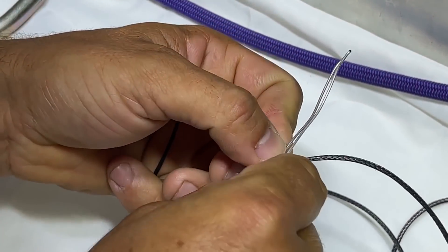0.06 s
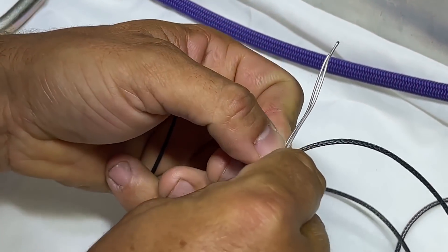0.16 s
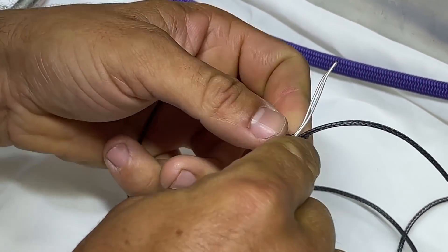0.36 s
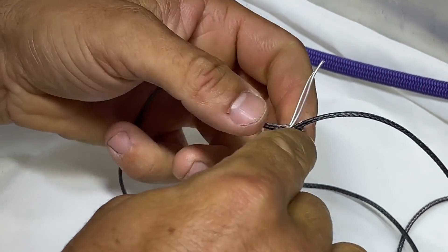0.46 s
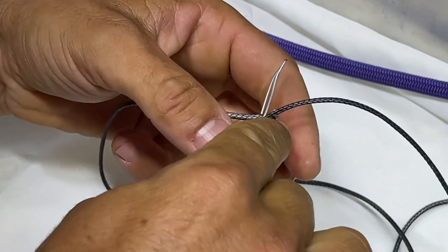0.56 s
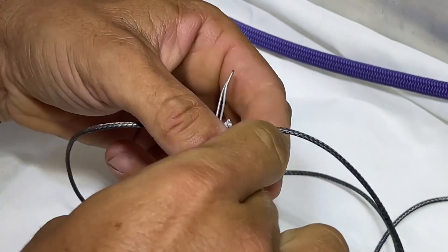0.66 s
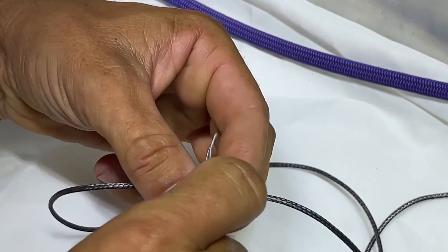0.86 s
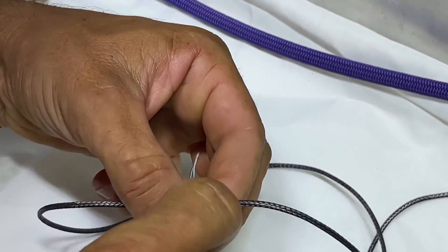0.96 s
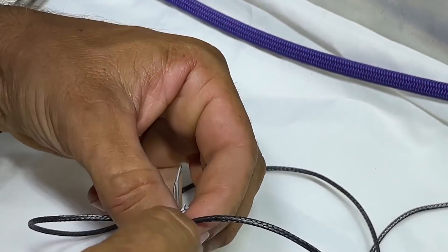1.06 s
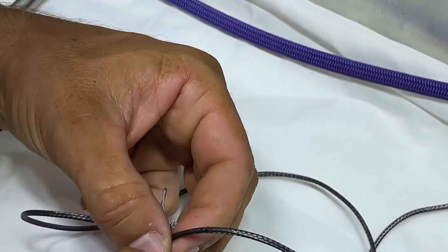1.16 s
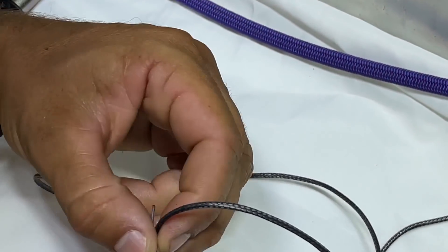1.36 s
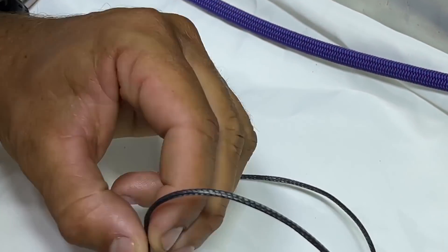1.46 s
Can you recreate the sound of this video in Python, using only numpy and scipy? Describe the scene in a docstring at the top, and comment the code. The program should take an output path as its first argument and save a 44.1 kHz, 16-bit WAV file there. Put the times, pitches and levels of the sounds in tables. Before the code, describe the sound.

A sharp double knock on a hard object comes at about 0.2 seconds, and the table rings low for a moment. A cord rustles softly, with light clicks and two faint, high wire squeaks around 0.7 seconds. Four short, ringing scrapes follow between 0.8 and 1.1 seconds. Lighter clicks and scrapes come from 1.2 to 1.5 seconds. Everything is close, over a faint electrical hum in a quiet room.

```python
"""Cord and wire tool at a work table

Close to the microphone, in a quiet room with a mains hum, hands work a cord with a thin wire tool.
The cord rustles through the fingers and makes the wire sing as it slides; the tool clicks lightly.
Something hard on the table is knocked, then scraped in a few short strokes, and rings with the
same modes each time. Under the heavy knock the table top rings low."""
import sys
import numpy as np
from scipy import signal
from scipy.fft import rfft, irfft, next_fast_len
from scipy.io import wavfile
from scipy.ndimage import map_coordinates

SR = 44100
rng = np.random.default_rng(int(sys.argv[2]) if len(sys.argv) > 2 else 0)


def bounce(signal):
    """Save signal as a 16-bit WAV file at the path given by the first command-line argument."""
    frames = np.transpose(np.atleast_2d(signal))
    limited = np.clip(frames, -1, 1)
    pcm = np.round(limited * 32767).astype(np.int16)
    wavfile.write(sys.argv[1], SR, pcm)


N = 66150


def amp(db):
    return 10 ** (np.asarray(db) / 20)


def unit_rms(x):
    return x / np.sqrt(np.mean(x ** 2) + 1e-20)


def along(points, hz):
    """Read (pitch_hz, value) points on a log frequency axis."""
    pitches, values = np.transpose(points)
    return np.interp(np.log(hz + 1), np.log(pitches + 1), values)


def since(start_s):
    """Seconds since start_s, zero before it."""
    return np.maximum(np.arange(N) / SR - start_s, 0)


def fade(t, t60):
    return np.exp(-np.log(1000) * t / t60)


def wobble(knots_per_s):
    """A smooth random curve."""
    return map_coordinates(rng.standard_normal(N), [since(0) * knots_per_s], mode="wrap")


def filtered(x, response):
    """Apply the gain response(hz) to x."""
    size = next_fast_len(N + SR // 2)
    return irfft(rfft(x, size) * response(np.fft.rfftfreq(size, 1 / SR)), size)[..., :N]


def tone(hz, left_db=0, drift_rad=0.23, drift_per_s=40, spread_rad=0.49):
    """One slightly unsteady mode, its phase spread between left and right."""
    phase = 2 * np.pi * (hz * since(0) + rng.random()) + drift_rad * wobble(drift_per_s)
    sides = np.array([[.5], [-.5]])
    return np.sqrt(2) * amp(sides * left_db) * np.sin(phase + sides * spread_rad * rng.choice([-1, 1]))


# Likeness of left and right at the microphone: pitch_hz, correlation
STEREO_LIKENESS = [(100, 0.97), (300, 0.45), (700, 0.8), (2000, 0.91), (4000, 0.78), (6500, 1), (8000, 1),
                   (10000, -0.95), (12000, 0.028)]
# Balance at the microphone: pitch_hz, left_over_right_db
STEREO_BALANCE = [(200, 2.2), (600, 1.6), (1200, 3), (2000, -0.5), (8000, 0.5)]
def coloured(pair, spectrum):
    """Two unrelated signals become a stereo sound of rms 1; the spectrum sets only its shape."""
    def mid_side_gain(hz):
        angle = np.arccos(np.clip(along(STEREO_LIKENESS, hz), -1, 1)) / 2
        return amp(along(spectrum, hz)) * [np.cos(angle), np.sin(angle)]
    mid, side = filtered(pair, mid_side_gain)
    balance = lambda hz: amp(np.outer([.5, -.5], along(STEREO_BALANCE, hz)))
    return unit_rms(filtered(np.array([mid + side, mid - side]), balance))


def noise(spectrum):
    return coloured(rng.standard_normal((2, N)), spectrum)


# Room tone around the table: pitch_hz, density_db
ROOM_SPECTRUM = [(20, -24), (45, -4.5), (70, 4.5), (95, -1), (160, -11.5), (300, -16.5), (440, -17),
                 (650, -35), (1200, -35), (4000, -58.5), (11000, -37.5), (13000, -62)]
def room(rumble_db=-61.5, hum_hz=119.8, hum_db=-52.5):
    """Mains hum over the low rumble of a quiet room."""
    hum = np.sqrt(2) * np.sin(2 * np.pi * hum_hz * since(0))
    return amp(rumble_db) * noise(ROOM_SPECTRUM) + amp(hum_db) * hum


# The cord's high hiss and lower rub, close to the microphone: time_s, level_db
HISS_LEVELS = [(0, -81), (.1, -84.5), (.16, -89), (.19, -70), (.33, -64), (.40, -60.5), (.46, -72),
               (.53, -63.5), (.59, -61.5), (.66, -55.5), (.70, -64), (.76, -60.5), (.83, -68.5),
               (1.1, -80.5), (1.17, -68.5), (1.23, -71.5), (1.36, -66.5), (1.42, -72), (1.5, -56.5)]
RUB_LEVELS = [(0, -92.5), (.17, -90), (.39, -74.5), (.46, -69), (.55, -73.5), (.62, -66), (.7, -61.5),
              (.78, -59), (.84, -56.5), (1.1, -78), (1.21, -80.5), (1.41, -75), (1.5, -58)]
# Their colours: pitch_hz, density_db
HISS_SPECTRUM = [(2000, -11.5), (3500, 4), (4600, -4.5), (5400, 1), (7000, -2), (8700, 7), (10200, 11.5),
                 (11700, -9.5), (12600, -35), (14000, -48)]
RUB_SPECTRUM = [(400, -30), (880, -5), (1170, 10), (1600, 9.5), (2200, 11), (3000, -5.5), (4500, 0.5),
                (8000, -39)]
def cord_rustle(levels, spectrum, fibre_db=0.5, grip_db=2.5):
    """Fibres catch in fine grains while the grip of the fingers wavers."""
    grains = rng.standard_normal((2, N)) * amp(fibre_db * wobble(knots_per_s=500))
    level_db = np.interp(since(0), *np.transpose(levels)) + grip_db * wobble(knots_per_s=60)
    return coloured(grains, spectrum) * amp(level_db)


# Modes of the wire tool in the hand: pitch_hz
WIRE_MODES_HZ = [4945, 5400, 7440, 8600, 9830, 12500]
# Each mode's share in a loose slide and in a tight pull: relative_db
LOOSE_MODES_DB = [3.5, -23, -29, -11, -24, -34]
TIGHT_MODES_DB = [-28, -6, 2.5, -8, 3.5, -14]
# The cord's moves along the wire: peak_s, swell_s, fall_s
LOOSE_SLIDES = [(.658, .022, .016), (.756, .018, .022)]
TIGHT_PULL = (1.428, .028, .012)
def wire_song(move, modes_db, level_db, waver_db=3.4):
    """Thin, wavering notes swell as the cord slides along the wire."""
    peak_s, swell_s, fall_s = move
    t = since(0)
    notes = sum(amp(db + waver_db * wobble(130)) * tone(hz, drift_rad=0.67, drift_per_s=37)
                for hz, db in zip(WIRE_MODES_HZ, modes_db))
    envelope = np.exp(-np.maximum((peak_s - t) / swell_s, (t - peak_s) / fall_s))
    return amp(level_db) * notes * envelope


# Modes of the table top under the hands: pitch_hz, level_db, t60_s
TABLE_MODES = [(232, -47, 0.3), (329.4, -37, 0.26), (367.4, -41.5, 0.14), (673, -38, 0.094)]
def table_thud(start_s=.232, rise_s=0.015):
    """The heavy knock sets the table top ringing low."""
    t = since(start_s)
    ring = sum(amp(db) * tone(hz) * fade(t, t60) for hz, db, t60 in TABLE_MODES)
    return (1 - np.exp(-t / rise_s)) * ring


# Decay of the dense modes of the hard body on the table: pitch_hz, t60_s
DENSE_DECAY = [(300, 0.42), (1200, 0.23), (3500, 0.18), (9000, 0.13)]
def dense_modes(spectrum, colour, ripple, release_s, depth_db=7, spacing_hz=40):
    """Many weak modes leave the same fine peaks and dips each time, and die away from release_s."""
    peaks = lambda hz: amp(depth_db * np.tanh(map_coordinates(ripple, [hz / spacing_hz], mode="wrap")))
    wash = unit_rms(filtered(noise(spectrum), peaks))
    hz, t, bands = signal.stft(filtered(wash, colour), SR, nperseg=256)
    decay = fade(np.maximum(t - release_s, 0), along(DENSE_DECAY, hz)[:, None])
    return signal.istft(bands * decay, SR, nperseg=256)[1][:, :N]


# Clear modes of the same body: pitch_hz
BODY_HZ = [1177, 1225, 1293, 1352, 1417, 1655, 2228, 2330, 2612, 2806, 3355, 3438, 3700, 4150, 4947, 6410,
           7036, 8620]
# One row for each of them: knocked_db, scraped_db, t60_s, left_over_right_db
BODY_MODES = [(-3.5, 0.5, 0.21, 1), (-9, -15.5, 0.3, 7), (-21, -33, 0.35, -20.5), (-13.5, -28, 0.2, 19),
              (-7.5, -13.5, .28, 7), (-5, -12.5, 0.17, 4.5), (-3.5, -16, 0.14, 0.5), (-19, -18.5, 0.28, -4),
              (-5.5, -36, 0.23, -1.5), (-8.5, -19, .2, 3), (3.5, -8, 0.23, -2.5), (-1.5, -20.5, 0.18, 10.5),
              (0.5, -37, 0.063, -3), (-17, -39, .13, 5), (-4.5, -25, 0.14, -1), (3, -25.5, 0.057, 2),
              (-17, -48, 0.132, -5), (-9, -37, 0.085, -5)]
def scraped_ring(low_power, high_power, waver_db=1.8):
    """Each clear mode stores the power of the scraping and rings on, wavering."""
    ring = np.zeros((2, N))
    for hz, (_, db, t60, left_db) in zip(BODY_HZ, BODY_MODES):
        retained = fade(2 / SR, t60)  # energy falls twice as fast as amplitude
        energy = signal.lfilter([1 - retained], [1, -retained], high_power if hz > 2000 else low_power)
        envelope = amp(db + waver_db * wobble(69.8)) * np.sqrt(energy)
        ring += envelope * tone(hz, left_db, drift_rad=0.43, drift_per_s=50)
    return ring


def struck_ring(tones, start_s, gain):
    """A blow starts all the clear modes at once; each fades at its own speed."""
    t = since(start_s)
    return sum(amp(db) * gain(hz) * np.roll(mode, round(start_s * SR), axis=1) * fade(t, t60)
               for hz, mode, (db, _, t60, _) in zip(BODY_HZ, tones, BODY_MODES))


# Short strokes on the body, heard close: start_s, length_s, level_db, low_ring_db, high_ring_db, treble_db
STROKES_ON_BODY = [(0.76, 0.15, -62, -6, 2.5, -5), (0.795, 0.033, -61, 13, -1.5, -14),
                   (0.848, .033, -40, 3, 8, 0), (0.922, 0.021, -39.5, 1, -1, -1.5),
                   (0.981, 0.015, -38.5, 4.5, -3, 0), (1.021, 0.051, -47, 4.5, -0.5, -2.5),
                   (1.248, 0.034, -53.5, 4, -11, 5.5), (1.305, 0.017, -54.5, 12, -7, 11),
                   (1.431, 0.045, -50, -1.5, 4, -8)]
# Colour of the scraping: pitch_hz, density_db
SCRAPE_SPECTRUM = [(200, -30), (500, -17), (850, -13.5), (1130, 6.5), (1500, -2.5), (1680, 5), (1950, -5.5),
                   (2350, 0), (2900, -6.5), (3500, -3), (4500, -13), (4950, -6), (5500, -15.5), (6500, -19),
                   (9300, -20.5), (10300, -47), (14000, -66)]
def scrapes(ripple, slips_per_s=920, rise_s=0.0066, fall_s=0.0032, grit_db=-3.5, wash_db=-1):
    """Irregular slips rattle the dense modes and pump up the clear ones."""
    out, power = np.zeros((2, N)), np.zeros((2, N))
    for start_s, length_s, db, low_ring_db, high_ring_db, treble_db in STROKES_ON_BODY:
        t, end_s = since(start_s), start_s + length_s
        pressure = (1 - np.exp(-t / rise_s)) * np.exp(-since(end_s) / fall_s)
        slipping = rng.random(N) < slips_per_s / SR
        slips = slipping * amp(rng.uniform(-4.8, 3, N)) * rng.choice([-1, 1], (2, N))
        colour = lambda hz: amp(along([(2000, 0.018), (6000, treble_db)], hz))
        grit = pressure * filtered(coloured(slips, SCRAPE_SPECTRUM), colour)
        build_up = np.sqrt(1 - fade(t, t60=.045))
        wash = build_up * dense_modes(SCRAPE_SPECTRUM, colour, ripple, end_s)
        out += amp(db) * (amp(grit_db) * grit + amp(wash_db) * wash)
        power += (amp(db) * amp([[low_ring_db], [high_ring_db]]) * pressure) ** 2
    return out + scraped_ring(*power)


# Knocks and light tool clicks, close to the microphone:
# start_s, level_db, low_mid_db, treble_db, low_ring_db, high_ring_db, crack_db, crack_t60_s
BLOWS = [(.027, -64, -1.5, 0, -29, -8, 20, 0.017), (.218, -30.5, 7.5, -9, -5.5, -5, -5.5, 0.11),
         (0.2343, -29, -9.5, -1.5, 6, 5, 5.5, 0.054), (.352, -57.5, -1, 4.5, -5.5, 4, 6.5, 0.077),
         (.416, -65, 10.5, 0.5, -21, 11.5, -16, 0.019), (0.4758, -58, 15, -0.5, -2, -3, 4, 0.03),
         (.564, -73, -25, 18.5, -10, -4, 2, 0.091), (0.676, -51, -20, -2, -14, 1, 9, 0.083),
         (0.714, -56.5, -0.5, -6, -25, 2, 9.5, 0.026), (1.238, -72.5, 16, 14.5, -14, -16, -7, 0.038),
         (1.2525, -48.5, 3.5, 6, -16, 3, 5, 0.096), (1.318, -57.5, 11, -5.5, -17, 12, -4, 0.034),
         (1.436, -48, 3.5, 10, -13, -25, -6, 0.03)]
# Colour of their crack and wash: pitch_hz, density_db
BLOW_SPECTRUM = [(100, -37), (400, -23), (850, -16), (1020, -15), (1220, 2), (1550, -9.5), (2000, -10.5),
                 (2900, -7.5), (3450, -7), (4400, -5), (5050, -7), (5650, -14.5), (6500, -7), (7400, -11),
                 (9200, -4), (10200, -7), (11900, -18.5), (12800, -36), (15000, -54)]
def knocks(ripple, attack_s=0.00074, ring_trim_db=-6.5):
    """Each blow is a crack, a wash of dense modes and the body's clear ring."""
    out = np.zeros((2, N))
    tones = [tone(hz, left_db) for hz, (*_, left_db) in zip(BODY_HZ, BODY_MODES)]
    for start_s, db, low_mid_db, treble_db, low_ring_db, high_ring_db, crack_db, crack_t60 in BLOWS:
        t = since(start_s)
        colour = lambda hz: amp(along([(1600, low_mid_db), (3400, 0), (8000, treble_db)], hz))
        ring_gain = lambda hz: amp(ring_trim_db + along([(4000, low_ring_db), (4800, high_ring_db)], hz))
        crack = amp(crack_db) * filtered(noise(BLOW_SPECTRUM), colour) * fade(t, crack_t60)
        wash = dense_modes(BLOW_SPECTRUM, colour, ripple, start_s)
        ring = struck_ring(tones, start_s, lambda hz: colour(hz) * ring_gain(hz))
        out += amp(db) * (1 - np.exp(-t / attack_s)) * (crack + wash + ring)
    return out


def scene():
    """Knocks, scrapes and the moving cord up close, the room's hum behind them."""
    ripple = rng.standard_normal(SR // 10)  # one pattern of dense modes for knocks and scrapes
    wire = sum(wire_song(slide, LOOSE_MODES_DB, level_db=-57) for slide in LOOSE_SLIDES)
    wire += wire_song(TIGHT_PULL, TIGHT_MODES_DB, level_db=-63)
    cord = cord_rustle(HISS_LEVELS, HISS_SPECTRUM) + cord_rustle(RUB_LEVELS, RUB_SPECTRUM)
    return knocks(ripple) + table_thud() + scrapes(ripple) + wire + cord + room()


def record(dry):
    """The recorder keeps nothing above its band limit."""
    return filtered(dry, lambda hz: hz < 15800)


dry = scene()
out = record(dry)
bounce(out)
```